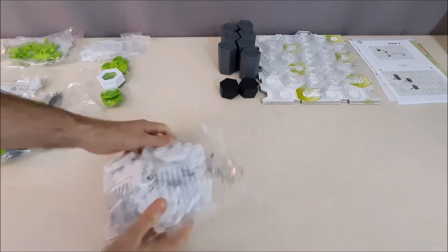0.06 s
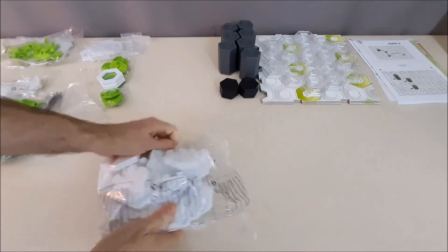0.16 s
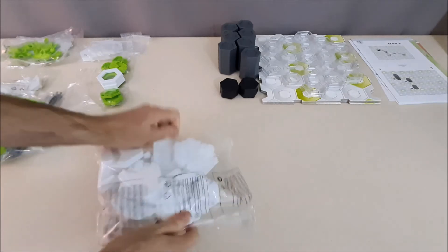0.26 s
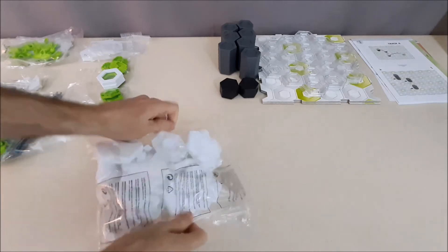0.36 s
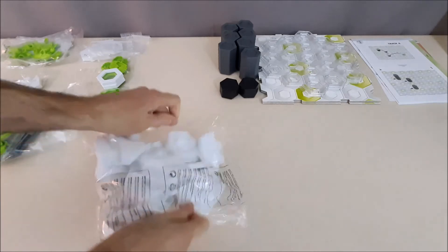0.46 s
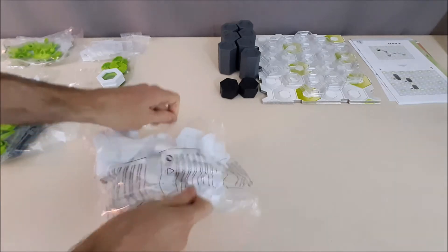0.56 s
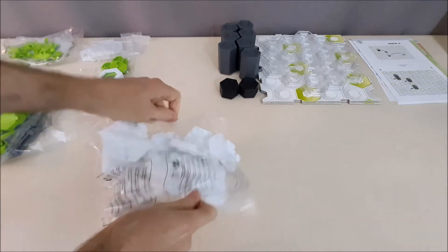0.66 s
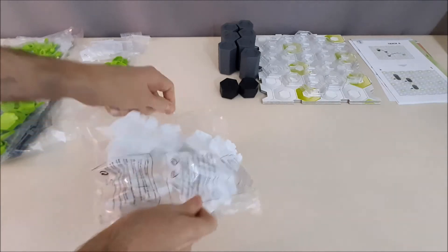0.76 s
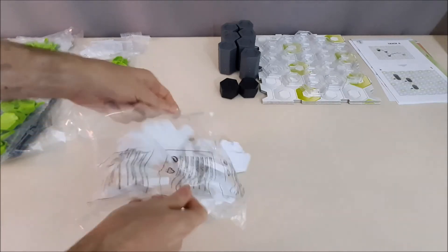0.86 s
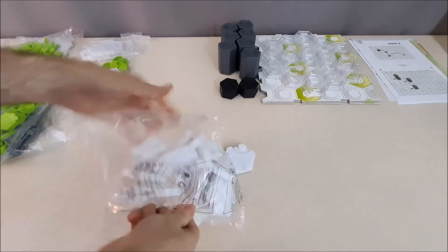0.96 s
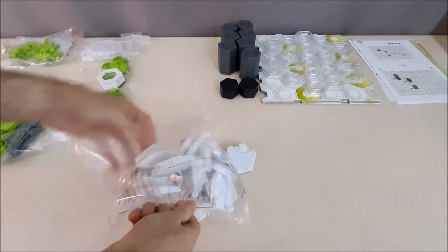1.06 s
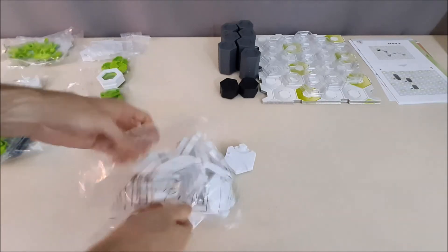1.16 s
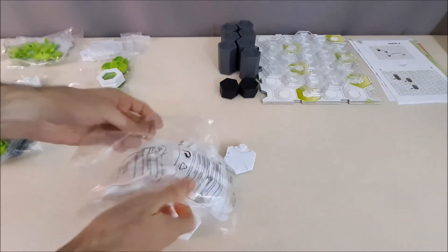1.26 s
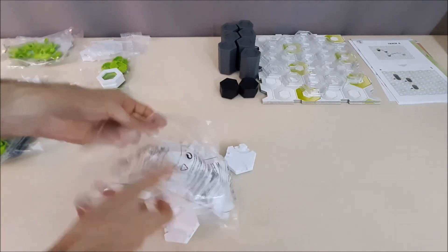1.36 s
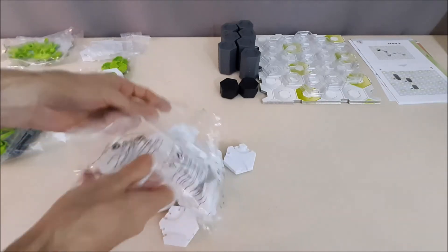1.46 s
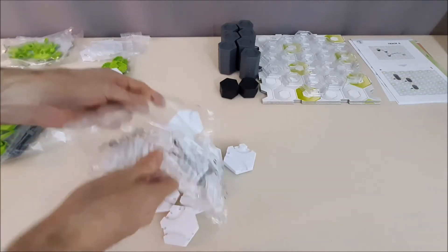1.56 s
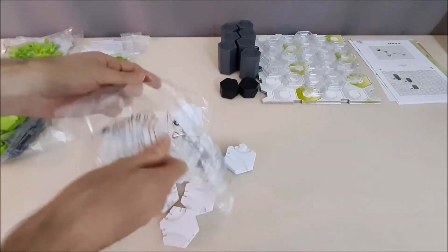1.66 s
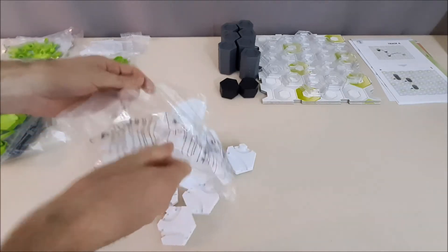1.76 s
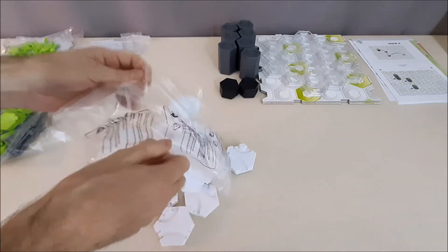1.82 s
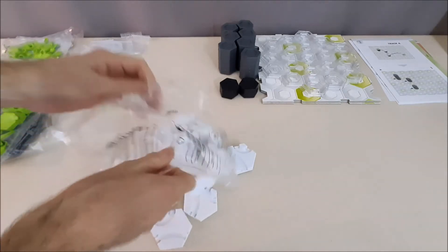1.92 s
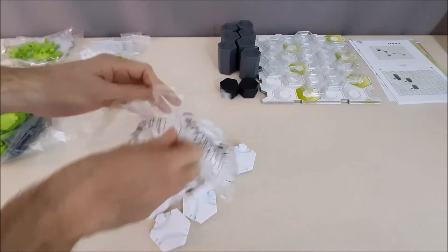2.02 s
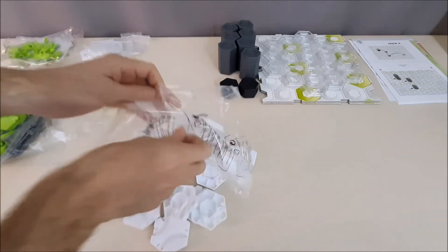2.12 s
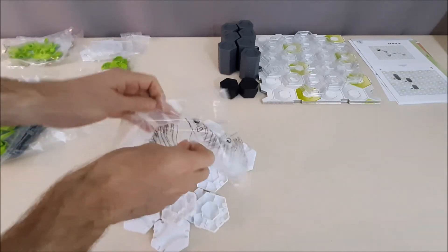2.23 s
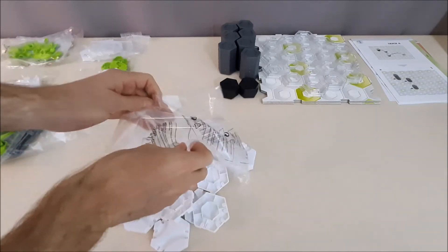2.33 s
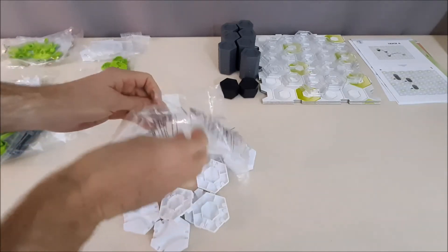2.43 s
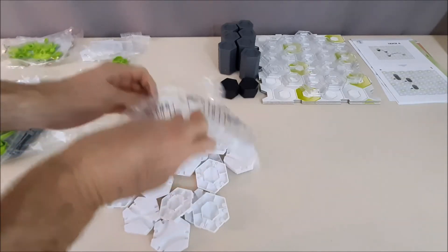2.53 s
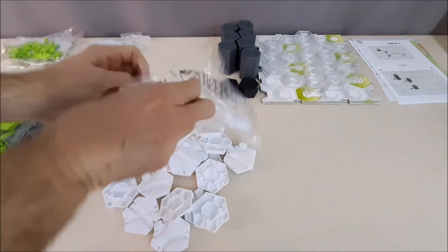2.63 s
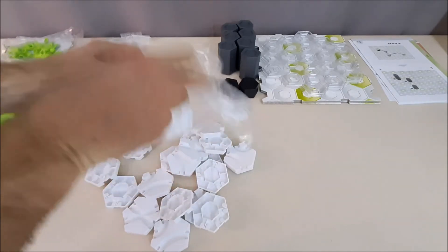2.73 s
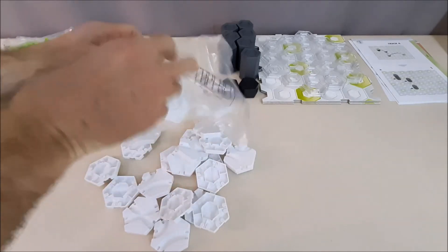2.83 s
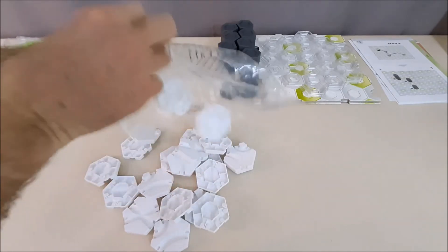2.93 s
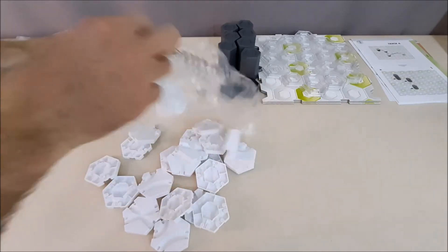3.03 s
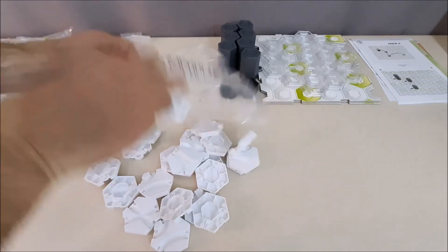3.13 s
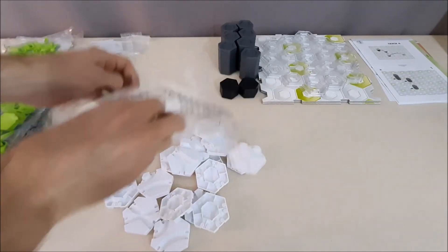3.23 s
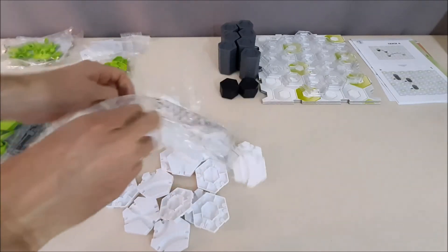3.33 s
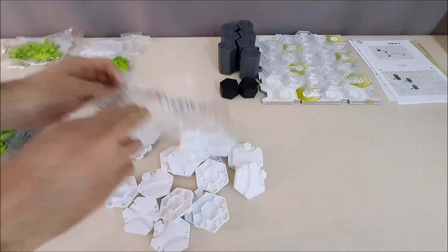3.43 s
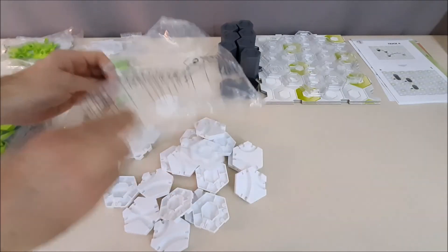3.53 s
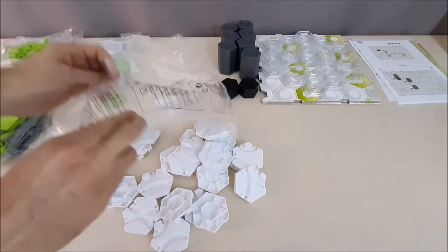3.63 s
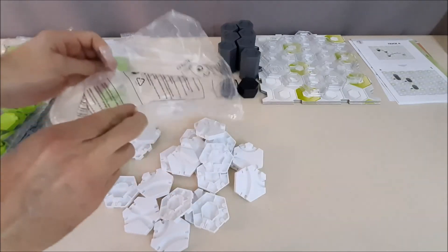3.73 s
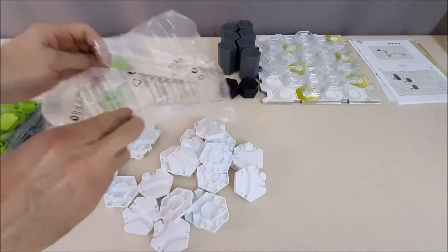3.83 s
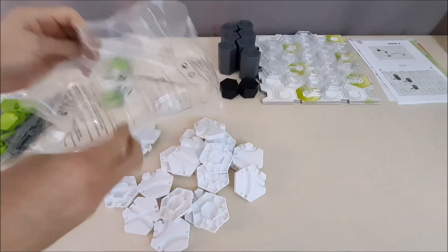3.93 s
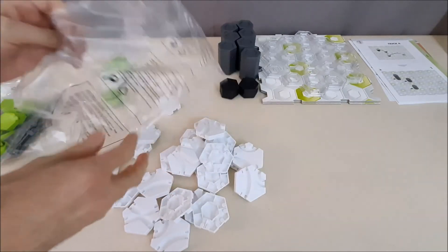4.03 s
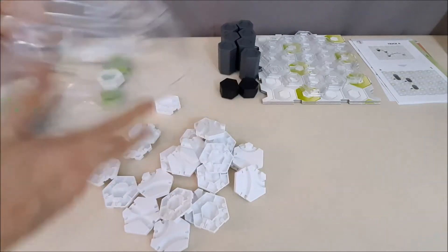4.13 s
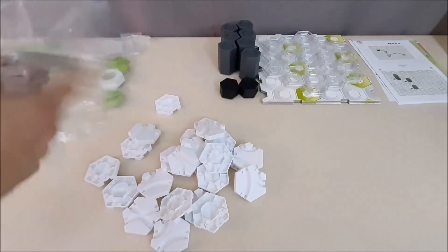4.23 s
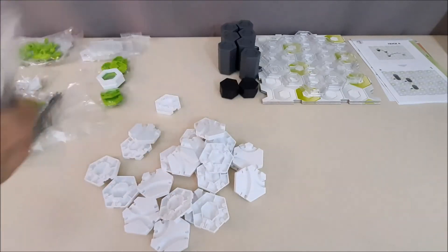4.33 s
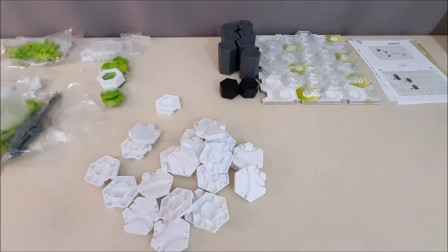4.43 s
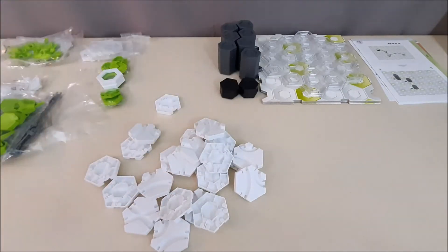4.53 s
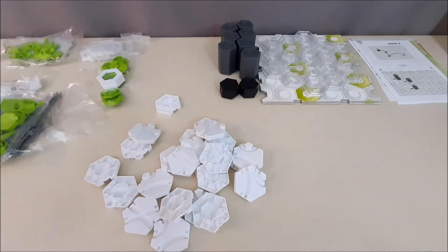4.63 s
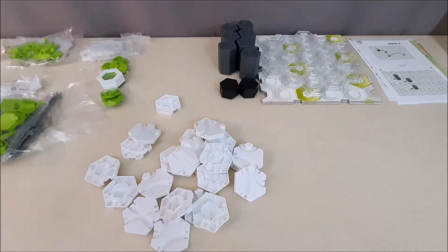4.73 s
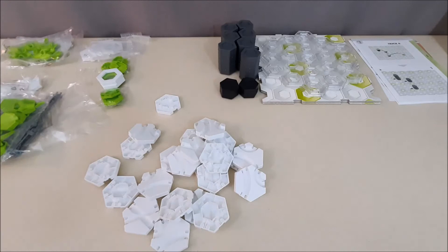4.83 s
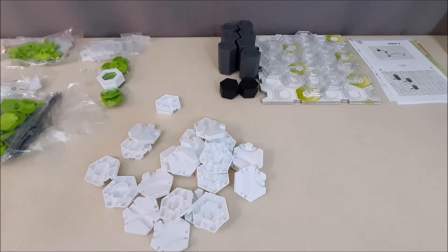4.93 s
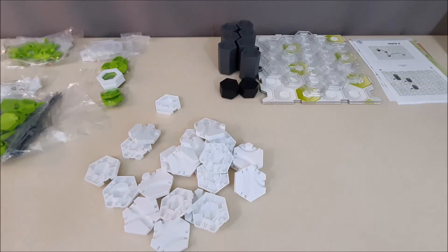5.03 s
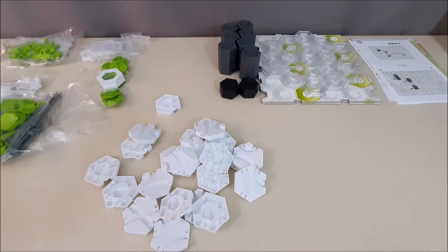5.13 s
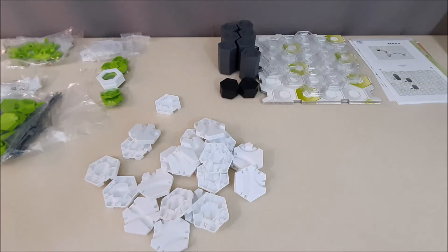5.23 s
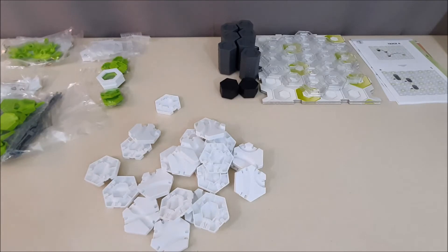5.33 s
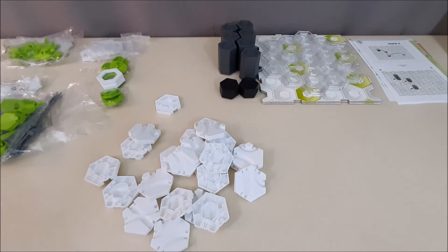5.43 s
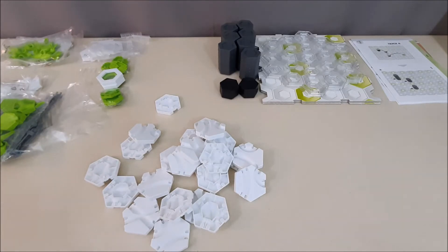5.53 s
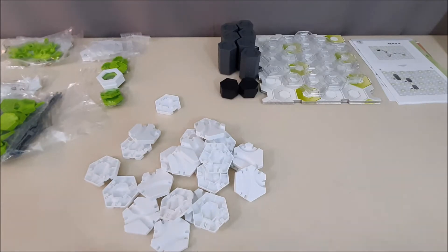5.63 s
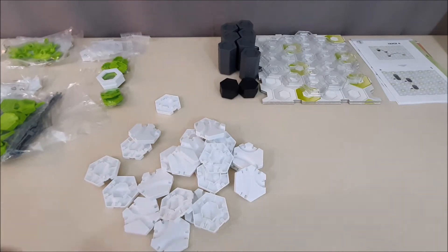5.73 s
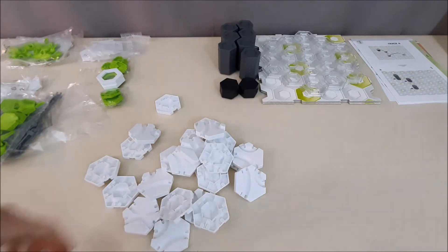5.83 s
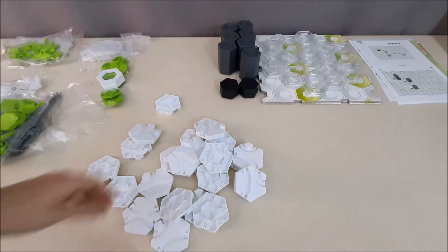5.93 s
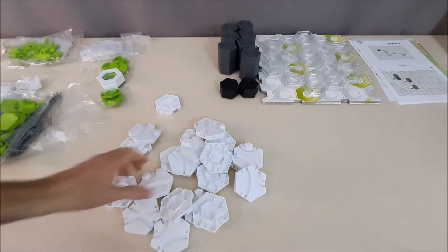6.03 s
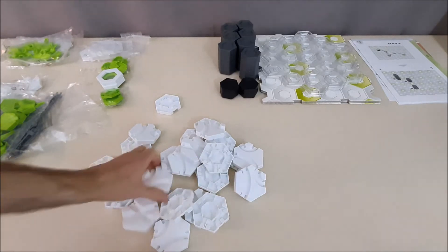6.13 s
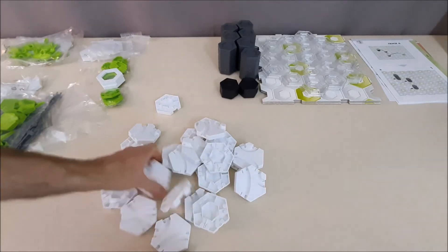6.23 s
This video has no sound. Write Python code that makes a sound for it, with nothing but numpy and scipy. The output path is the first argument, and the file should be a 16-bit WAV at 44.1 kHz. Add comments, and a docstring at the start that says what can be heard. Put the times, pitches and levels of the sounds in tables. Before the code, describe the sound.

Shaken from thin plastic film, light hollow tiles clatter and clack onto a tabletop; the bag is crumpled aside, then a brief push clacks.

```python
"""Plastic tiles poured from a bag

Hexagonal plastic tiles are shaken out of a thin plastic bag onto a table in a small room.
Each contact rings a tile and knocks the table top (decaying sines and noise) while the film crinkles (tiny crackles).
The last tiles land as clear single blows and one rocks to rest; the empty bag is put aside.
Then a hand slides in and pushes the heap."""
import sys
import numpy as np
from scipy import signal
from scipy.fft import rfft, irfft
from scipy.io import wavfile
from scipy.ndimage import uniform_filter1d

SR = 44100
rng = np.random.default_rng(int(sys.argv[2]) if len(sys.argv) > 2 else 0)


def to_wav(sig):
    """Store sig (one row per channel, or 1-D mono) as 16-bit WAV at the path in sys.argv[1].

    Samples outside -1..1 are clipped; the rate is SR.
    """
    pcm = np.clip(np.atleast_2d(sig), -1, 1) * 32767
    pcm = np.round(pcm).astype(np.int16)
    wavfile.write(sys.argv[1], SR, pcm.T)  # frames by channels


N = 276507
T = np.arange(N) / SR
RING = T[:4096]  # time axis of one hit, in seconds

# The ways a tile rings: f/Hz, level/dB, time to fall by 60 dB/s
TILE_MODES = [(1511, 1, 0.11), (1959, 4, 0.047), (2058, -0.5, 0.056), (2390, -3.5, 0.058), (2650, 4, 0.097),
              (2960, -4.5, 0.03), (2930, 2.5, 0.12), (3290, 0.5, 0.029), (4060, -13, 0.014),
              (4390, 1, 0.048), (4590, -11, 0.014), (5160, -2.5, 0.058), (5480, -1.5, .025),
              (6220, -2.5, 0.013), (7360, -4.5, 0.025), (7930, -16.5, 0.014)]
# The ways the table top rings: f/Hz, level/dB, time to fall by 60 dB/s
TABLE_MODES = [(128, -13.5, 0.73), (186, -9, 0.071), (252.6, -2.5, 0.14), (274.8, -6.5, 0.19),
               (337, -7, 0.046), (398, -2.5, 0.028), (516, -1, 0.038), (691, -2.5, 0.064), (803, 2, 0.028),
               (898, -3, 0.038), (1014, 2, 0.029), (1200, -4, 0.034)]
# Tone colour of the crack when tiles meet: f/Hz, relative level/dB
CRACK_COLOUR = [(300, -23.5), (900, -4), (1600, 7), (2800, 4), (5000, 3), (7500, -28), (10000, -16.5),
                (16000, -46)]
# Tone colour of the sharp tick of a tile's edge: f/Hz, relative level/dB
EDGE_COLOUR = [(1500, -26.5), (4500, 8), (7500, 1.5), (11000, -1), (16000, -15)]
# Tone colour of the dull thud in the table: f/Hz, relative level/dB
THUD_COLOUR = [(40, -21), (85, -12), (135, -4), (230, -1), (330, -1.5), (560, -2), (900, 1.5), (1300, -4.5),
               (2200, -11), (6000, -64)]
# Tone colour of the crinkling film: f/Hz, relative level/dB
FILM_COLOUR = [(150, -33.5), (600, -10.5), (1200, -5.5), (1500, 1), (2100, 0.5), (3000, -1.5), (4200, -2.5),
               (7500, -5.5), (11000, -9), (16000, -8.5)]


def undb(db):
    """Turn decibels into a gain."""
    return 10 ** (np.asarray(db) / 20)


def colour(x, points):
    """Filter a sound to a drawn tone colour, with no sound ahead of its cause and an rms gain of 1."""
    hz, db = np.transpose(points)
    size = 2048
    freqs = np.arange(size // 2 + 1) * SR / size
    gain = undb(np.interp(np.log(freqs + 1), np.log(hz), db))
    # folding the cepstrum forward in time gives the minimum-phase filter
    cepstrum = irfft(np.log(gain / np.sqrt(np.mean(gain ** 2))))
    cepstrum[1:size // 2] *= 2
    cepstrum[size // 2 + 1:] = 0
    impulse = irfft(np.exp(rfft(cepstrum)))
    return signal.fftconvolve(x, impulse[None], axes=1)[:, :x.shape[1]]


def noise(size, apart):
    """Stereo noise; apart 0 is the same in both ears, 1 is unrelated."""
    mid, side = rng.standard_normal((2, size))
    return np.array([mid + apart * side, mid - apart * side]) / np.sqrt(1 + apart ** 2)


def unit(hit):
    """Scale a hit to rms 1 over about its first 6 ms."""
    return hit / np.sqrt(np.mean(hit[:, :256] ** 2))


def add(out, s, hit, lag=0):
    """Mix a hit in at time s, reaching the right ear lag samples later."""
    for ear, shift in enumerate((0, lag)):
        i = int(np.clip(s * SR + shift, 0, N))
        out[ear, i:i + hit.shape[1]] += hit[ear, :N - i]


def steady(x):
    """Even out the slow level of a texture and keep its grain."""
    power = uniform_filter1d(np.mean(x ** 2, axis=0), size=2600)
    return x / np.sqrt(np.maximum(power, 0) + 1e-6)


def burst(t60, apart):
    """A short dying crackle of noise; t60 is the time to fall by 60 dB, in seconds."""
    return unit(noise(len(RING), apart) * 1000 ** (-RING / t60))


def tone(hz, t60):
    """A single struck mode as a dying sine, met a little out of step by the two ears."""
    phase = np.array([[0], [rng.standard_normal()]])
    return unit(np.sin(2 * np.pi * hz * RING + phase) * 1000 ** (-RING / t60))


def ring(modes, weights, detune, apart):
    """One blow on a body: the place of contact sets each mode's share, and each ear hears its own mix."""
    hz, db, t60 = np.transpose(modes)
    hz = hz * (1 + detune * rng.standard_normal(len(hz)))
    t = RING.astype(np.float32)
    sines = np.sin(np.outer(np.float32(2 * np.pi * hz), t))
    decays = np.exp(np.outer(np.float32(-np.log(1000) / t60), t))
    shares = noise(len(hz), apart) * undb(db) * weights
    fade = 1 - RING / RING[-1]
    return unit(shares @ (sines * decays) * fade)


def bounced(hit, gap_s=0.0016, touch_db=-7, bounce_db=-5):
    """A tile lands in steps: a corner touches, the face strikes, then it bounces once."""
    gaps = rng.uniform([0.2, 0.5], [0.7, 1.8])
    strike, bounce = (SR * gap_s * np.cumsum(gaps)).astype(int)
    out = undb(touch_db) * hit
    out[:, strike:] += hit[:, :-strike]
    out[:, bounce:] += undb(bounce_db) * hit[:, :-bounce]
    return unit(out)


def crinkle(per_s, spread_db, t60):
    """Creases of unequal size, each a tiny crackle with one of eight stereo patterns."""
    out = np.zeros((2, N))
    sizes = undb(spread_db * np.minimum(rng.exponential(size=N), 4.5))
    chance, places = rng.random(N), rng.integers(0, 8, N)
    for place in range(8):
        clicks = sizes * (chance < per_s / SR) * (places == place)
        crackle = burst(t60, apart=0.93)[:, :512]
        out += signal.oaconvolve(clicks[None], crackle, axes=1)[:, :N]
    return steady(out)


def swell(start, rise_s, length, fall_db_per_s):
    """Gain of one movement: it builds up, holds to the end of its length and dies away."""
    rise = np.clip((T - start) / rise_s, 0, 1)
    return rise * undb(-fall_db_per_s * np.clip(T - start - length, 0, 1))


def together(shapes, levels_db):
    """Overlapping movements add in power; one gain curve for each column of levels."""
    return np.sqrt(undb(levels_db).T ** 2 @ np.array(shapes) ** 2)


def tumbling(per_s=330, spread_db=2.5, settle_db_per_s=185):
    """Many small contacts: each rings a tile with a crack and an edge tick, and passes a knock to the table."""
    # Each shake, drop or push sets off a surge of tiles:
    # start t/s, rise/s, length/s, tile clatter level/dB, table knock level/dB, film crinkle level/dB
    surges = [(0.0, 0.001, 0.0065, -24, -26.5, -43), (0.09, 0.042, 0.082, -17.5, -27.5, -32),
              (0.324, 0.026, 0.02, -23.5, -22, -31), (0.414, 0.049, 0.04, -13.5, -25, -42.5),
              (0.518, .02, 0.14, -19.5, -26.5, -38), (0.692, 0.027, 0.077, -22.5, -31.5, -43),
              (0.787, 0.14, 0.23, -15.5, -23.5, -37.5), (1.14, 0.05, .15, -21.5, -36.5, -41),
              (1.264, 0.11, 0.17, -19.5, -27, -37), (1.459, 0.045, 0.06, -16.5, -21, -40),
              (1.617, 0.026, 0.1, -25, -28.5, -45.5), (1.728, 0.038, 0.16, -21.5, -25.5, -43),
              (1.878, 0.11, 0.34, -16, -22, -34), (2.242, 0.011, 0.12, -23, -28.5, -43.5),
              (2.438, 0.023, .045, -31, -27, -62.5), (3.07, .015, 0.015, -34, -24, -28.5),
              (3.278, .012, 0.016, -37, -27.5, -44), (3.42, 0.013, 0.055, -27, -25, -58),
              (3.48, 0.014, 0.07, -20.5, -27.5, -33.5), (3.625, 0.012, 0.03037, -35.5, -33.5, -54),
              (5.966, .008, 0.38, -61, -59.5, -68.5), (6.166, 0.029, 0.03, -26.5, -25.5, -52),
              (6.23, 0.033, 0.046, -30, -27.5, -46)]
    # between shakes the tiles keep shifting in the tipped bag (same columns)
    pour = (0.095, 0.02, 2.38, -31, -33.5, -46)
    moves = np.array([pour] + surges)
    shapes = [swell(start, rise_s, length, settle_db_per_s) for start, rise_s, length in moves[:, :3]]
    clatter, knock, film = together(shapes, moves[:, 3:])

    tiles, cracks, table, thuds = np.zeros((4, 2, N))
    for s, a, b in rng.random((int(per_s * N / SR), 3)):
        s *= T[-1]
        if clatter[int(s * SR)] < undb(-80):  # too quiet to be worth computing
            continue
        # a few contacts are much harder than the rest; the hard ones tend to reach the table too
        size, weight = undb(-spread_db * np.log(np.array([a, (a + b) / 2]) + 0.024))
        lag = rng.integers(-5, 6)
        add(tiles, s, size * ring(TILE_MODES, 1, detune=0.032, apart=0.92), lag)
        add(cracks, s, size * burst(t60=0.015, apart=0.77), lag)
        add(table, s, weight * ring(TABLE_MODES, 1, detune=0.031, apart=0.11), lag)
        add(thuds, s, weight * burst(t60=0.024, apart=0.067), lag)
    tiles = steady(tiles + undb(-1.5) * colour(cracks, CRACK_COLOUR))
    ticks = undb(-17) * steady(colour(cracks, EDGE_COLOUR))
    table = steady(table + undb(-2.5) * colour(thuds, THUD_COLOUR))
    creases = colour(crinkle(per_s=640, spread_db=3.5, t60=0.015), FILM_COLOUR)
    return undb(-3.5) * clatter * (tiles + ticks) + undb(0.08) * knock * table + undb(5.5) * film * creases


def blows(lead_t60=0.015, crack_db=-5):
    """Hard single blows; the corner that lands makes one mode sing briefly above the rest."""
    # Single tile blows: t/s, strongest ring f/Hz, table knock level/dB, tile clack level/dB
    landings = [(0.006, 3000, -50.5, -27.5), (0.151, 2500, -36.5, -23), (0.178, 2560, -31, -12),
                (0.248, 2450, -36.5, -23.5), (0.321, 4550, -30, -21.5), (0.348, 1530, -25, -17.5),
                (0.482, 2750, -21.5, -21.5), (0.596, 2677, -36, -24), (0.624, 4336, -27.5, -19),
                (0.899, 2780, -21, -22), (0.924, 2930, -29.5, -25.5), (0.96, 4233, -21.5, -23.5),
                (1.0, 2110, -20, -26), (1.343, 2500, -20.5, -34.5), (1.421, 4340, -22, -22),
                (1.511, 2740, -33, -19.5), (1.844, 4410, -32, -21), (1.861, 2548, -32, -16.5),
                (1.965, 2930, -19, -16.5), (2.029, 2930, -20.5, -30), (2.046, 2430, -14.5, -18.5),
                (2.152, 4380, -22.5, -16), (2.161, 4231, -31.5, -16), (2.198, 3520, -25.5, -21.5),
                (2.273, 4400, -23, -25), (2.368, 3215, -18.5, -21), (2.459, 1421, -26, -21.5),
                (3.072, 2700, -28.5, -14), (3.091, 2800, -33, -15), (3.123, 2710, -37, -21),
                (3.141, 2860, -27.5, -20), (3.198, 2800, -32, -31), (3.266, 3267, -36.5, -25),
                (3.297, 2930, -31.5, -17), (3.417, 2820, -19.5, -26), (3.433, 2980, -26.5, -21),
                (3.46, 4100, -39, -22.5), (3.495, 2660, -36, -22), (3.529, 2700, -28, -24),
                (3.629, 2930, -27, -22.5), (3.661, 1520, -44, -35), (3.698, 2060, -52, -34),
                (3.722, 2910, -33, -27), (3.741, 2840, -27.5, -40.5), (6.187, 1984, -25, -19.5),
                (6.192, 4900, -27.5, -20.5)]
    # sharper contacts ring higher and tick harder: the tick against the clack at the main ring
    tick_db, tick_db_per_octave, main_ring_hz = -9, 4, 2500
    out, cracks, thuds, edges = np.zeros((4, 2, N))
    for s, hz, knock_db, clack_db in landings:
        lag = rng.integers(-2, 5)
        edge_db = clack_db + tick_db + tick_db_per_octave * np.log2(hz / main_ring_hz)
        clack = ring(TILE_MODES, 1, detune=0.025, apart=0.78) + undb(5.5) * tone(hz, lead_t60)
        add(out, s, undb(clack_db) * bounced(clack), lag)
        add(cracks, s, undb(clack_db + crack_db) * bounced(burst(t60=0.049, apart=0.38)), lag)
        add(out, s, undb(knock_db) * ring(TABLE_MODES, 1, detune=0.035, apart=0.57), lag)
        add(thuds, s, undb(knock_db) * bounced(burst(t60=0.051, apart=0.25)), lag)
        add(edges, s, undb(edge_db) * bounced(burst(t60=0.026, apart=0.25)), lag)
    cracks = colour(cracks, CRACK_COLOUR)
    thuds = undb(-1.5) * colour(thuds, THUD_COLOUR)
    return out + cracks + thuds + colour(edges, EDGE_COLOUR)


def bumps(ring_db=-6, lowest_hz=80):
    """Soft pushes give a dull thud of filtered noise and stir mainly the table's low modes."""
    # Soft bumps of hands and bag on the table: t/s, level/dB, highest f of the push/Hz
    pushes = [(0.06, -23, 705), (0.069, -33, 388), (0.081, -21.5, 387), (4.215, -37, 126),
              (4.263, -43, 173), (4.651, -60, 170.6), (5.974, -67, 1297), (6.151, -37.5, 1022),
              (6.177, -31.5, 585), (6.207, -27.5, 540)]
    out = np.zeros((2, N))
    mode_hz = np.array(TABLE_MODES)[:, 0]
    for s, db, top_hz in pushes:
        soft = 1 / (1 + (mode_hz / top_hz) ** 4)  # the softer the push, the fewer high modes
        band = signal.butter(3, [min(lowest_hz, top_hz / 2), top_hz], "band", fs=SR, output="sos")
        thud = signal.sosfilt(band, burst(t60=0.099, apart=0.25))
        thud /= np.sqrt(np.mean(thud[:, :SR // 40] ** 2))
        table = ring(TABLE_MODES, soft, detune=0.03, apart=0.19)
        add(out, s, undb(db) * (thud + undb(ring_db) * table))
    return out


def bag(snap_t60=0.009, relax_db_per_s=177.5):
    """The film's stiff creases snap through one by one; handled empty, it crinkles, slides and flutters."""
    # Creases snapping through in the film: t/s, level/dB, f that sets the noise band/Hz
    creases_snapping = [(0.309, -20.5, 5300), (0.424, -27, 5600), (0.623, -20.5, 8900), (0.729, -28, 5000),
                        (1.749, -28.5, 3706), (2.198, -14, 8000), (2.428, -32, 4600), (2.664, -44, 6400),
                        (2.774, -34, 5860), (2.793, -38, 8900), (2.878, -44, 6800), (2.965, -36, 5600),
                        (3.063, -27.5, 3800), (3.072, -20.5, 9150), (3.912, -47, 5100), (3.947, -49, 5700),
                        (3.966, -41, 5400), (4.029, -40, 7900), (4.073, -49.5, 5900), (4.108, -41, 8350),
                        (4.165, -34, 3800), (4.378, -29, 8350), (4.564, -36.5, 5400), (4.65, -23.5, 9800),
                        (4.795, -31.5, 9000), (5.315, -53, 9000)]
    # Strokes of the hands on the empty bag:
    # start t/s, rise/s, length/s, crinkle level/dB, flutter level of the loose film/dB
    hand_strokes = [(2.545, 0.033, 0.27, -54.5, -61.5), (2.752, .02, 0.029, -45, -49.5),
                    (2.866, 0.0091, .18, -42.5, -53), (3.902, .01, 0.014, -66, -57),
                    (3.948, 0.035, 0.037, -44.5, -51), (4.104, .01, .07, -47.5, -57.5),
                    (4.163, 0.092, 0.13, -27.5, -40.5), (4.312, 0.076, 0.18, -31.5, -48),
                    (4.576, 0.048, 0.08, -31.5, -47.5), (4.69, 0.058, 0.24, -35, -56),
                    (5.082, .07, 0.094, -43, -63.5), (5.215, .03, .11, -57.5, -73),
                    (5.448, 0.013, 0.063, -56, -60.5), (5.501, 0.025, 0.14, -47.5, -59.5),
                    (5.85, .015, 0.053, -67.5, -88)]
    # Tone colour of the fluttering film: f/Hz, relative level/dB
    flutter_colour = [(40, -12.5), (120, -3.5), (350, -3), (700, -5), (1100, -7.5), (2200, -20),
                      (6000, -56.5)]
    snaps = np.zeros((2, N))
    for s, db, hz in creases_snapping:
        band = signal.butter(1, [hz / 4.8, min(hz * 1.48, 0.45 * SR)], "band", fs=SR, output="sos")
        snap = unit(signal.sosfilt(band, burst(snap_t60, apart=1.0)))
        add(snaps, s, undb(db) * snap, lag=4.3)

    strokes = np.array(hand_strokes)
    shapes = [swell(start, rise_s, length, relax_db_per_s) for start, rise_s, length in strokes[:, :3]]
    handling, flapping = together(shapes, strokes[:, 3:])
    # gentle handling only slides film over film; firmer handling buckles it
    buckling = handling / (handling + undb(-52))
    creases = np.sqrt(buckling) * crinkle(per_s=900, spread_db=2, t60=0.0022)
    sliding = np.sqrt(1 - buckling) * crinkle(per_s=6000, spread_db=-1.5, t60=0.013)
    rustle = undb(-1.5) * handling * colour(creases + sliding, FILM_COLOUR)
    loose_film = colour(crinkle(per_s=810, spread_db=2.5, t60=0.0043), flutter_colour)
    flutter = undb(2.3) * flapping * loose_film
    leftward = undb(np.array([[0.9], [-0.9]]))  # a little louder in the left ear
    return leftward * (snaps + rustle + flutter)


def rocking(start=3.6, stop=3.765, hz=1510, t60=0.075, db=-30, fade_db=-7):
    """A tile rocks on its rim: quick taps keep its lowest mode singing, and weaken as it lies flat."""
    out = np.zeros((2, N))
    for progress in np.linspace(0, 1, num=8):
        s = start + (stop - start) * progress + 0.0018 * rng.standard_normal()
        tap = tone(hz, t60) + 0.68 * ring(TILE_MODES, 1, detune=0.015, apart=0.5)
        add(out, s, undb(db + fade_db * progress ** 4) * tap)
    return out


def room(x, wet_db=-4, early_db=-7, early_t60=0.1):
    """Things on the table scatter the sound at once; the walls add a tail, longest and most alike in the bass."""
    # The room's decay: f/Hz, time to fall by 60 dB/s
    decay = np.array([(100, 0.71), (300, 0.34), (800, 0.16), (2000, 0.38), (6000, 0.3), (15000, 0.037)])
    t = T[:SR * 3 // 4]
    freqs = np.arange(len(t) // 2 + 1) * SR / len(t)
    octave = np.log2(np.clip(freqs, 125, 16000) / 125)
    echo = 0
    for k in range(8):  # one band of noise per octave, from 125 Hz up
        hz = 125 * 2 ** k
        t60 = np.interp(np.log(hz), np.log(decay[:, 0]), decay[:, 1])
        spectrum = rfft(noise(len(t), min(1, hz / 700)))
        band = irfft(spectrum * np.maximum(1 - abs(octave - k), 0), len(t))
        late = 1000 ** (-t / t60) * np.clip(t / 0.012, 0, 1)
        early = 1000 ** (-t / early_t60) * (t > 0.001)
        late = undb(wet_db) * late / np.linalg.norm(late)
        early = undb(early_db) * early / np.linalg.norm(early)
        echo = echo + band * (late + early)
    return x + signal.fftconvolve(x, echo, axes=1)[:, :N]


def scene(open_share=0.067):
    """Tiles, table and bag in the room, over faint background air; hard blows also come directly."""
    # Tone colour of the background air: f/Hz, relative level/dB
    air_colour = [(30, -1), (130, 2), (400, -14), (1500, -10), (5000, -13.5), (16000, -21.5)]
    air = undb(-70) * colour(noise(N, apart=0.7), air_colour)
    hard = blows()
    sources = tumbling() + hard + bumps() + bag() + rocking()
    return undb(-1.48) * room(sources) + open_share * hard + air


def record(dry):
    """The microphone colours the sound and drops deep bass; the recorder clips at full scale and cuts the top."""
    # The microphone's colour: f/Hz, relative level/dB
    mic_colour = [(100, -2), (7900, 3), (8700, -7), (9800, -2), (11300, 4.5), (16000, -1)]
    low_cut_hz, top_hz = 84, 16100
    low_cut = signal.butter(2, low_cut_hz, "high", fs=SR, output="sos")
    heard = signal.sosfilt(low_cut, colour(dry, mic_colour))
    top_cut = signal.ellip(10, 0.2, 75, top_hz, fs=SR, output="sos")
    return signal.sosfilt(top_cut, np.clip(heard, -1, 1))


dry = scene()
out = record(dry)
to_wav(out)
```